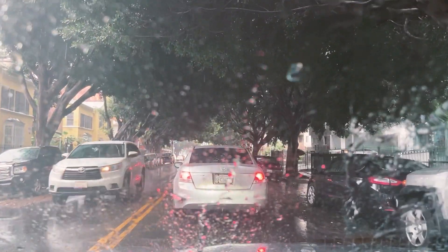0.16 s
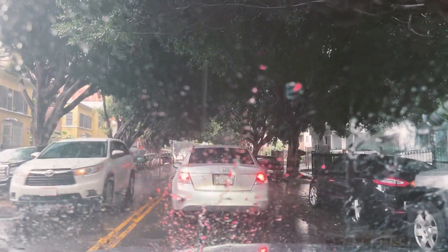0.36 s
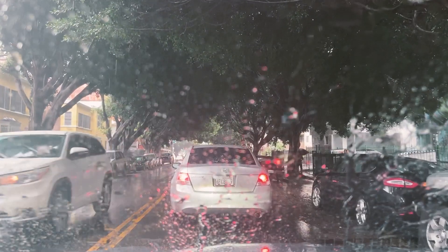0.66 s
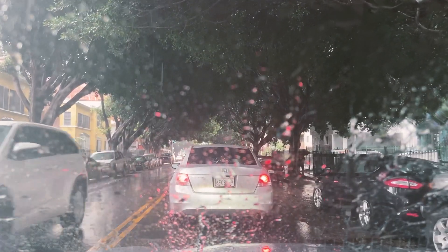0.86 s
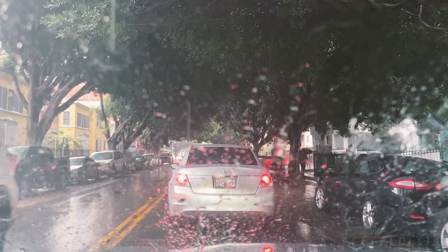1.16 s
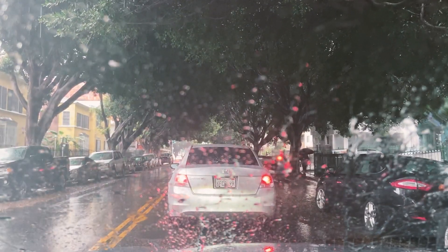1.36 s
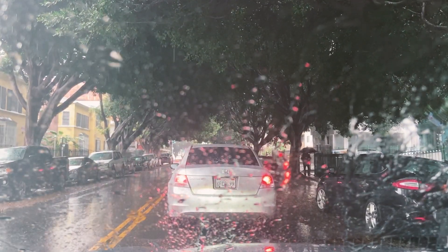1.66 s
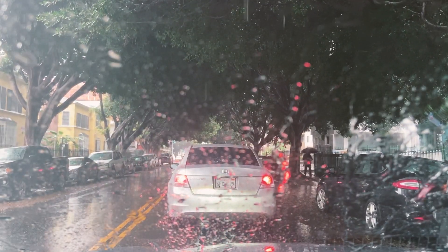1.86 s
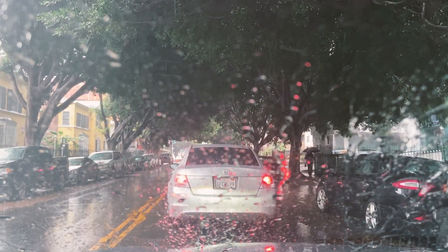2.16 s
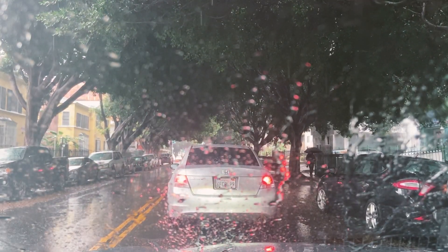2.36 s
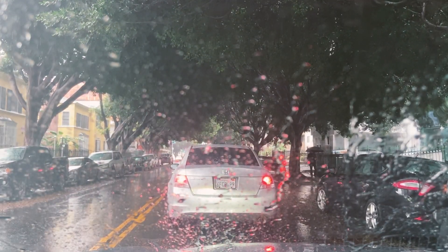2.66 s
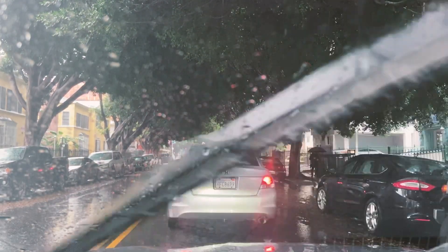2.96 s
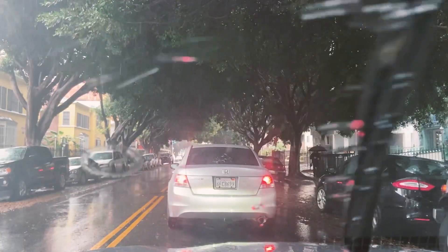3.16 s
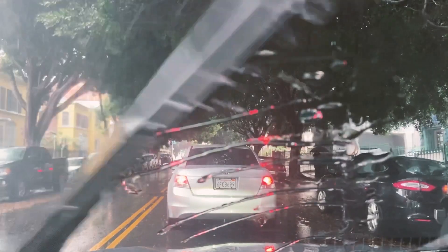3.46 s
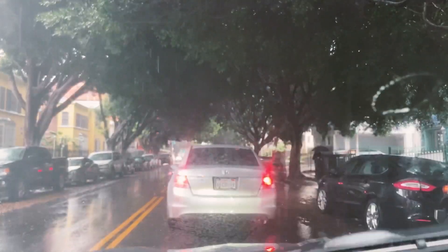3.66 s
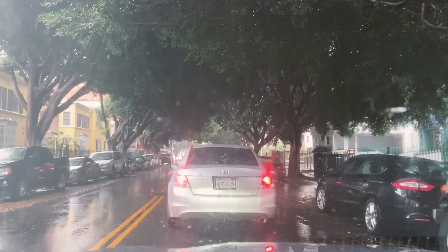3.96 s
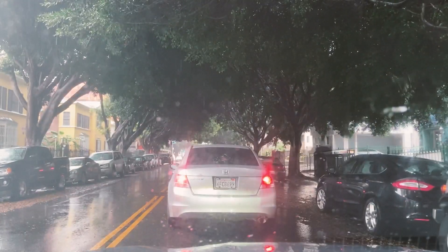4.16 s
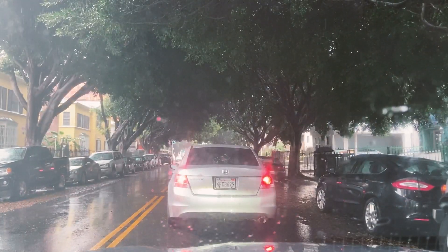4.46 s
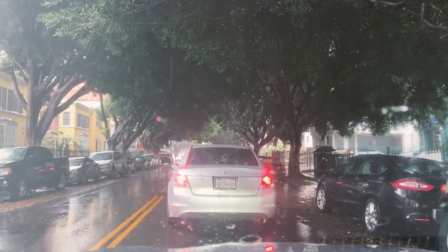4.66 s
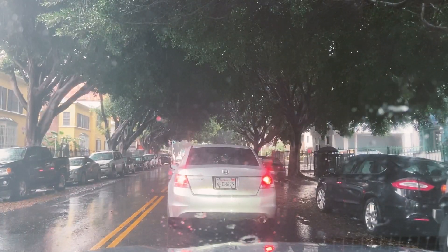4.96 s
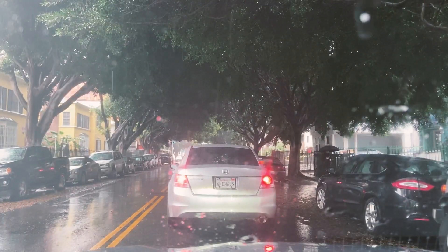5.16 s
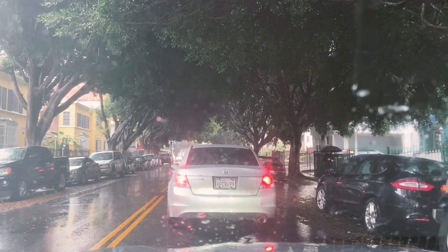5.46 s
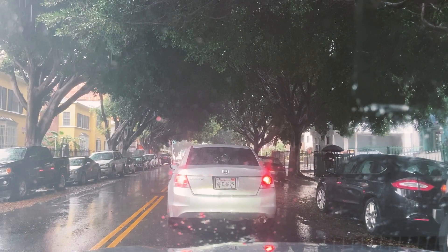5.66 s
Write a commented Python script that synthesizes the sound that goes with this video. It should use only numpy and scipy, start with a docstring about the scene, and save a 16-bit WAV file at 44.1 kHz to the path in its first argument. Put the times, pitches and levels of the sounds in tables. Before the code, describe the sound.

Heavy drops patter and knock on a car roof over a low engine idle, with one booming wiper sweep midway.

```python
"""Inside a car that waits in traffic on a wet street under dripping trees, its engine idling.
From the start fat drops drum on the roof, a noise blow ringing dense panel modes, over a finer patter.
Drops crack on the windscreen as short noise ticks, and some burst into a grainy sizzle of spray.
At 2.6 s the wipers start with sliding low booms, clacks, rubber drag and a motor drone.
They thump again at 3.3 s as they turn round and drag back; the rain and the idle go on to the end."""
import sys
import numpy as np
from scipy import signal
from scipy.fft import rfft, irfft, next_fast_len
from scipy.io import wavfile
from scipy.ndimage import uniform_filter1d

SR = 44100
rng = np.random.default_rng(int(sys.argv[2]) if len(sys.argv) > 2 else 0)


def transcribe(u):
    """Save the signal u as a 16-bit wav file named by the first command-line argument.

    u: samples, shape (n,) or (channels, n), limited to [-1, 1]; the rate is SR.
    q: integer samples, one column per channel.
    """
    v = np.clip(np.atleast_2d(u).T, -1, 1)
    q = np.round(v * 32767).astype(np.int16)
    wavfile.write(sys.argv[1], SR, q)


N = 256662
TIME = np.arange(N) / SR  # seconds


def amp(db):
    """Decibels to gain."""
    return 10 ** (np.asarray(db) / 20)


def unit(x):
    """Scales to rms 1."""
    return x / np.sqrt(np.mean(x ** 2) + 1e-20)


def read(points, hz):
    """Reads a table on a log-frequency axis."""
    f, value = np.transpose(points)
    return np.interp(np.log(hz + 1), np.log(f), value)


def follow(rows):
    """A control curve at every sample."""
    return np.interp(TIME, *np.transpose(rows))


def add(mix, s, sound):
    """Adds a sound into the mix at a time in seconds."""
    part = mix[..., max(round(s * SR), 0):][..., :sound.shape[-1]]
    part += sound[..., :part.shape[-1]]


def wander(hz):
    """Slow random drift of rms 1, with little above the given rate."""
    smooth = np.exp(-(np.fft.rfftfreq(N, 1 / SR) / hz) ** 2)
    return unit(irfft(rfft(rng.standard_normal(N)) * smooth, N))


def bursts(rows):
    """Sum of bell-shaped swells; each row: peak in seconds, level in dB, half length in seconds."""
    return sum(amp(db) * np.exp(-((TIME - s) / half) ** 2) for s, db, half in rows)


# Spread of the sound in the cabin. Each row: frequency in Hz, side over mid in dB.
CABIN_WIDTH = [(40, -17.5), (70, -14), (130, -10), (250, -5.5), (500, 0.7), (1000, 3), (2000, -1.8),
               (4000, -0.8), (8000, -7)]
# Balance of the cabin. Each row: frequency in Hz, left over right in dB.
CABIN_LEAN = [(50, 7.5), (125, 4.5), (250, 0.7), (500, 0.6), (1000, 0), (2000, 1), (4000, 4), (8000, 0)]


def cabin(pair, spectrum, modes=()):
    """Colours a mid and a side signal with a minimum-phase body of rms gain 1, then spreads them."""
    size = next_fast_len(N + SR // 2)
    hz = np.fft.rfftfreq(size, 1 / SR)
    peaks_db = sum(db / (1 + (2 * (hz - f) / w) ** 2) for f, w, db in modes)
    gain = unit(amp(read(spectrum, hz) + peaks_db))
    # the phase follows from the gain, so that nothing sounds ahead of the blow
    both_sides = np.r_[gain, gain[1:(size + 1) // 2][::-1]]
    causal = np.exp(np.conj(signal.hilbert(np.log(both_sides))))[:len(hz)]
    mid, side = rfft(pair, size) * causal
    width, lean = amp(read(CABIN_WIDTH, hz)), amp(read(CABIN_LEAN, hz) / 2)
    left, right = (mid + width * side) * lean, (mid - width * side) / lean
    return irfft(np.array([left, right]), size)[:, :N]


# Ring time over the spectrum. Each row: frequency in Hz, factor on the ring time.
RING_FACTOR = [(120, 1.75), (500, 1.7), (1500, 0.97), (4000, 0.86), (9000, 0.51)]
THUD_HZ, THUD_OCTAVES = 226, 0.86  # where a heavy drop flexes the whole panel, and how widely


def splat(t60, bright_db, thud_db=0, patchy_db=2.0, ripple_db=5.5, rise=0.00032, spray_s=0.01):
    """One blow on a panel: dense modes, coloured by where it lands, the bass ringing longest."""
    spatter = 0.24  # unevenness of the blow's noise
    punch, punch_s = 0.49, 0.0034  # extra strength of the first moment, and its fade in seconds
    echo, echo_s = 0.42, 0.007  # strength and longest delay in seconds of the edge echo
    t = np.arange(SR // 3) / SR
    hz = np.fft.rfftfreq(len(t), 1 / SR)
    centres = np.geomspace(100, 10000, 14)  # Hz
    bands = np.array([np.interp(np.log(hz + 1), np.log(centres), row) for row in np.eye(len(centres))])
    droplets = np.exp(spatter * unit(uniform_filter1d(rng.standard_normal(len(t)), size=90)))
    blow = rfft(unit(droplets * rng.standard_normal((2, len(t)))))
    # each spot wakes some clusters of modes and misses others
    ripple = np.tanh(unit(uniform_filter1d(rng.standard_normal(len(hz)), size=45)))
    clusters = unit(amp(ripple_db * ripple * np.clip(hz / 1000, 0, 2)))
    # the blow comes back from the edge of the panel, sooner or later from spot to spot
    delay = echo_s * rng.random()
    clusters = clusters * (1 + echo * np.exp(-2j * np.pi * hz * delay)) / np.hypot(1, echo)
    modes = irfft((clusters * blow)[:, None] * bands, len(t))
    # brightness tilts the colour about 1 kHz, in dB per tenfold frequency
    colour_db = patchy_db * rng.uniform(-1, 1, len(centres)) + bright_db * np.log10(centres / 1000)
    colour_db = colour_db + thud_db * np.exp(-(np.log2(centres / THUD_HZ) / THUD_OCTAVES) ** 2)
    decay_db = -60 * t / (t60 * read(RING_FACTOR, centres))[:, None]
    # the treble is spray, which lands a moment after the blow
    attack = 1 - np.exp(-t / (rise + spray_s * centres / centres[-1])[:, None])
    # the struck spot rings hardest at first, until the blow has spread over the panel
    attack = attack * (1 + punch * np.exp(-t / punch_s) / (1 + (centres[:, None] / 2000) ** 2))
    return (modes * attack * amp(colour_db[:, None] + decay_db)).sum(1)


# Fat drops on the roof. Each row: start in seconds, level in dB before the trim,
# splash brightness in dB per tenfold frequency, extra thud of the panel in dB.
FAT_DROPS = [(0.01, -26.5, 0, -4), (0.076, -32.5, 12.5, -6.5), (0.103, -28.5, 2, -8.5),
             (0.24, -33.5, -1.5, 3.5), (0.328, -38.5, 0.5, 2), (0.389, -29.5, -1.5, -0.5),
             (0.518, -30, 9.5, -2), (0.565, -26.5, -12, -12), (0.594, -28.5, -3, 7.5),
             (0.727, -27, -11, -8.5), (0.77, -32.5, 3, 0.5), (0.841, -28, 1, -2.5),
             (0.863, -27.5, -0.5, 11.5), (0.931, -27.5, 1, -3), (0.973, -35, 0, 5.5), (1.144, -33.5, 5, 2),
             (1.218, -30.5, 4.5, -6.5), (1.285, -33.5, -11.5, 2), (1.333, -25.5, -8.5, -13.5),
             (1.372, -24.5, -3, -4.5), (1.493, -29, 3, -3), (1.538, -32.5, -5.5, 4), (1.633, -28, 0.5, 4),
             (1.716, -41, -7, 3.5), (1.883, -32.5, 4, -8), (1.988, -28, 0.5, -2.5), (2.118, -27, -7, -1.5),
             (2.175, -34.5, -2.5, 0), (2.239, -26.5, -4.5, -4), (2.43, -32, 2.5, 3.5),
             (2.512, -31.5, 1, -2), (2.698, -35, -4.5, -7), (2.753, -30.5, 0, -0.5), (2.878, -41, 13, 0),
             (2.934, -33, 9, -2), (3.018, -32, 5, -3), (3.081, -31.5, 4, 6), (3.15, -33, -6.5, 5),
             (3.187, -33.5, -9, 9.5), (3.229, -30, -4, 1), (3.373, -30, 3, 4), (3.462, -25, -5.5, -14.5),
             (3.504, -29, -4, -6), (3.565, -42, -5, 11), (3.624, -28.5, -7.5, 1.5), (3.705, -28.5, -9, -5),
             (3.778, -30.5, -4.5, -1), (3.83, -34.5, -9, -2), (3.886, -31.5, -7.5, -5),
             (3.971, -34.5, -1, 1), (4.029, -28, -3, -2.5), (4.087, -24.5, -7, -9),
             (4.141, -28.5, -8, -6.5), (4.188, -31.5, 3, 0.5), (4.461, -30, -2.5, -1.5),
             (4.511, -35.5, 8.5, -10), (4.551, -49, 7, 0), (4.585, -31.5, -3, -4.5), (4.677, -25.5, -4, 2),
             (4.728, -30, -2, 5.5), (4.773, -42.5, -12, 8), (4.818, -31.5, -1, 0), (4.869, -31, 4, 2),
             (4.907, -25.5, -1.5, 7.5), (4.976, -29.5, 0, 3.5), (5.158, -29.5, -4.5, -2.5),
             (5.202, -38, -13.5, 1.5), (5.283, -28.5, 6, 4.5), (5.505, -34.5, 7, 2), (5.62, -31.5, 1, 2),
             (5.655, -43.5, -9, 11), (5.75, -32.5, 2.5, 4)]
# Colour of the roof heard from the seats. Each row: frequency in Hz, relative level in dB per Hz.
ROOF_COLOUR = [(60, -29.5), (110, 1), (165, 1.5), (240, -8.5), (450, -8.5), (700, -12), (1100, -12),
               (1700, -17.5), (2900, -24), (4700, -26), (6300, -32), (8400, -31), (10000, -41.5)]
# Strongest roof panel modes. Each row: frequency in Hz, width in Hz, height in dB above the rest.
ROOF_MODES = [(186, 16, 4), (285, 18, 3.5), (365, 70, 4.5), (480, 60, 3.5), (695, 80, 7.5), (985, 90, 3),
              (1160, 120, 3), (1533, 70, 4), (1830, 140, 2.5), (2457, 100, 4.5)]


def fat_drops(trim_db=-5):
    """Water gathered by the leaves falls on the roof in single heavy blows."""
    out = np.zeros((2, N))
    for s, db, bright_db, thud_db in FAT_DROPS:
        # ring time in seconds, before its factor over the spectrum
        add(out, s, amp(db + trim_db) * splat(0.22, bright_db, thud_db))
    return cabin(out, ROOF_COLOUR, ROOF_MODES)


# Fine rain between the flurries. Each row: time in seconds, level in dB before the patter's trim.
DRIZZLE_LEVEL = [(0, -38), (0.22, -44.5), (0.7, -47), (1.5, -39.5), (2.55, -48), (2.85, -43), (3.2, -36),
                 (3.4, -43), (3.9, -46.5), (4.25, -45), (4.43, -44.5), (4.6, -42), (5.08, -46),
                 (5.25, -40.5), (5.45, -45.5), (5.65, -38), (5.82, -40.5)]
# Flurries of small drops shaken from the branches.
# Each row: peak in seconds, level in dB before the patter's trim, fade in seconds.
BRANCH_FLURRIES = [(0.0, -26.5, 0.012), (0.109, -33, 0.039), (0.327, -36.5, 0.022), (0.44, -36.5, 0.056),
                   (0.529, -35, 0.062), (0.75, -36.5, 0.036), (0.839, -33.5, 0.047), (1.05, -33.5, 0.03),
                   (1.247, -35.5, 0.15), (1.471, -47.5, 0.18), (1.66, -40, 0.41), (2.01, -36, 0.062),
                   (2.253, -38, 0.24), (2.72, -29.5, 0.019), (3.246, -35, 0.0098), (3.56, -38, 0.23),
                   (3.80, -39.5, 0.16), (4.611, -32.5, 0.03), (5.29, -54, 0.09), (5.80, -39, 0.066)]


def rainfall(rise_s=0.047):
    """Strength of the fine rain: a drizzle plus flurries that rise and then thin out exponentially."""
    power = amp(follow(DRIZZLE_LEVEL)) ** 2
    for s, db, fade in BRANCH_FLURRIES:
        swell = np.exp(-np.maximum((s - TIME) / rise_s, (TIME - s) / fade))
        power = power + (amp(db) * swell) ** 2
    return np.sqrt(power)


def patter(per_s=560, spread_db=13, t60=0.074, trim_db=-7.5, spots=28):
    """Small drops of uneven size land at random on several spots of the roof."""
    size = amp(spread_db * rng.random(N)) * (rng.random(N) < per_s / SR)
    spot = rng.integers(0, spots, N)
    out = np.zeros((2, N))
    for k in range(spots):
        drop = splat(t60, bright_db=1, rise=0.0016, spray_s=0.0059)
        out += signal.oaconvolve((size * (spot == k))[None], drop, axes=1)[:, :N]
    return cabin(unit(out) * amp(trim_db) * rainfall(), ROOF_COLOUR, ROOF_MODES)


# Sharp drops on the windscreen. Each row: start in seconds, level in dB before the trim.
GLASS_TICKS = [(0.2389, -34.5), (0.3886, -41), (0.7716, -37.5), (0.9324, -46), (1.3724, -36.5),
               (1.698, -39), (1.715, -39), (1.9659, -43), (2.0817, -39), (2.1762, -37), (2.4518, -46),
               (2.4962, -40.5), (2.5115, -38), (2.699, -42.5), (2.8777, -40), (3.2908, -38.5),
               (3.3135, -36.5), (3.6238, -44), (3.708, -36), (4.084, -38), (4.0955, -45), (4.118, -39),
               (4.141, -38), (4.256, -47), (4.321, -42.5), (4.5535, -40.5), (4.678, -42), (4.8187, -48.5),
               (5.7773, -37)]
# Colour of a windscreen tick. Each row: frequency in Hz, relative level in dB per Hz.
GLASS_COLOUR = [(150, -12), (700, 8), (2000, -1), (4000, -3), (7500, -9), (10000, -16.5)]


def windscreen(crack_s=0.00042, ring_s=0.008, ring_db=-11, trim_db=4.0):
    """Drops crack on the stiff glass, which hardly rings; many tiny ones fall at random times."""
    per_s, small_db, spread_db = 24, -57, 5  # tiny drops: rate, lowest level before the trim, spread
    t = np.arange(SR // 20) / SR
    times = TIME[rng.random(N) < per_s / SR]
    small = [(s, small_db + spread_db * min(rng.exponential(), 2)) for s in times]
    out = np.zeros((2, N))
    for s, db in list(GLASS_TICKS) + small:
        blow, shimmer = rng.standard_normal((2, 2, len(t)))
        crack = np.sign(blow) * np.exp(-t / crack_s)
        ring = amp(ring_db) * shimmer * np.exp(-t / ring_s)
        add(out, s, amp(db + trim_db) * (crack + ring))
    return cabin(out, GLASS_COLOUR)


# Drops that burst into fine spray on the glass.
# Each row: peak in seconds, level in dB, half length in seconds.
SPRAY_BURSTS = [(0.454, -52, 0.02), (0.512, -54, 0.012), (0.586, -51, 0.026), (0.71, -53, 0.015),
                (1.474, -48, 0.019), (2.145, -50.5, 0.021), (2.236, -48, 0.012), (2.534, -50.5, 0.013),
                (3.152, -50, 0.017), (3.235, -49, 0.013), (3.489, -51, 0.024), (4.60, -57, 0.017),
                (4.928, -52, 0.024), (4.977, -53.5, 0.015), (5.077, -49, 0.011), (5.225, -48.5, 0.0083),
                (5.302, -57, 0.017), (5.379, -48.5, 0.019), (5.528, -52.5, 0.022), (5.81, -51, .025)]
# Colour of the spray. Each row: frequency in Hz, relative level in dB per Hz.
SPRAY_COLOUR = [(500, -12), (1500, 3.5), (3000, 1), (4700, -0.5), (6300, -5.5), (8400, -12.5), (10000, -13)]


def spray(per_s=2200, spread_db=18, tail_s=0.0023, spots=4):
    """A burst drop showers the glass with tiny droplets: a short, grainy sizzle."""
    t, out = np.arange(SR // 50) / SR, np.zeros((2, N))
    for _ in range(spots):
        droplets = amp(spread_db * rng.random(N)) * (rng.random(N) < per_s / spots / SR)
        grain = rng.standard_normal((2, len(t))) * np.exp(-t / tail_s)
        out += signal.oaconvolve(droplets[None], grain, axes=1)[:, :N]
    return cabin(unit(out) * bursts(SPRAY_BURSTS), SPRAY_COLOUR)


# Knocks of the wiper drive through the body. Each row: start in seconds, level in dB,
# starting pitch in Hz, rise in seconds, time to fall 60 dB in seconds.
WIPER_THUMPS = [(2.607, -24, 105, 0.0078, 0.13), (2.626, -22.5, 101.8, 0.011, 0.45),
                (2.686, -31, 71, 0.009, 0.25), (3.257, -22.5, 128, 0.018, 0.22),
                (3.287, -20, 112.2, 0.0313, 0.48), (3.3, -27, 170, 0.012, 0.18),
                (3.349, -22.5, 71.4, 0.015, 0.31)]


def wiper_thumps(left_db=1.3, uneven=0.77, upper=2.3, upper_db=-12):
    """The linkage takes up its load, booming in the cabin, each boom sliding down as it unloads."""
    sag, sag_s = 0.12, 0.074  # share of the pitch lost, and how quickly in seconds
    t, knocks = np.arange(SR) / SR, np.zeros(N)
    for s, db, hz, rise, t60 in WIPER_THUMPS:
        swell = np.minimum(t / rise, 1) * amp(-60 * np.maximum(t - rise, 0) / t60)
        pitch = hz * (1 - sag * (1 - np.exp(-t / sag_s)))
        angle = 2 * np.pi * np.cumsum(pitch) / SR + uneven * wander(41)[:SR]
        # a higher mode of the bulkhead dies twice as fast
        overtone = amp(upper_db) * swell ** 2 * np.sin(upper * angle)
        add(knocks, s, amp(db) * (swell * np.sin(angle) + overtone))
    # the body passes little below 35 Hz
    knocks = signal.sosfilt(signal.butter(2, 35, "highpass", fs=SR, output="sos"), knocks)
    return knocks * amp([[left_db], [-left_db]])


# Blades dragging over the glass, out and back.
# Each row: start in seconds, length in seconds, level in dB.
BLADE_STROKES = [(2.61, 0.72, -43), (3.51, 0.18, -44.5)]
# Blades flipping over as they start and as they turn round.
# Each row: peak in seconds, level in dB, half length in seconds.
BLADE_FLIPS = [(2.639, -35, 0.039), (3.31, -36, 0.045)]
# Colour of the rubber on the glass. Each row: frequency in Hz, relative level in dB per Hz.
BLADE_COLOUR = [(25, -34), (55, -1), (110, 3.5), (165, -2.5), (215, -20.5), (300, -18), (500, -22.5),
                (1500, -46), (6000, -63)]


def wiper_blades(edge_s=0.052):
    """Rubber drags over the glass as low noise, swelling where the blades flip over."""
    sliding = np.zeros(N)
    for s, length, db in BLADE_STROKES:
        # the blades take a moment to get going and to stop
        sliding += amp(db) * np.clip(np.minimum(TIME - s, s + length - TIME) / edge_s, 0, 1)
    return cabin(rng.standard_normal((2, N)) * (sliding + bursts(BLADE_FLIPS)), BLADE_COLOUR)


# Play in the wiper joints closes with a clack.
# Each row: start in seconds, level in dB, brightness in dB per tenfold frequency.
JOINT_CLACKS = [(2.633, -28.5, 1), (2.698, -37, 7), (3.266, -34, -9), (3.292, -30, -4), (3.311, -41, 8),
                (3.322, -29, -6)]
# Colour of the linkage. Each row: frequency in Hz, relative level in dB per Hz.
LINKAGE_COLOUR = [(100, -1), (220, 8), (380, 10), (600, -2.5), (1100, -21), (1800, -31.5), (4000, -14.5),
                  (10000, -46)]


def wiper_joints(t60=0.02):
    """Short, hard knocks on top of the boom as the arms start and turn round."""
    out = np.zeros((2, N))
    for s, db, bright_db in JOINT_CLACKS:
        add(out, s, amp(db) * splat(t60, bright_db, patchy_db=1.5, ripple_db=5.0, spray_s=0.0005))
    return cabin(out, LINKAGE_COLOUR)


# Drone of the wiper motor under load. Each row: time in seconds, level in dB.
MOTOR_LEVEL = [(2.6, -65.5), (2.72, -42), (2.84, -35), (2.95, -39), (3.05, -56.5), (3.45, -43.5),
               (3.55, -37.5), (3.65, -52), (3.85, -60.5)]


def wiper_motor(hz=94, sag_hz=14, waver=0.87, drift=1.2):
    """The geared motor drones roughly through the bulkhead, slowing as its load grows."""
    level = amp(follow(MOTOR_LEVEL))
    # the pitch sits half the sag above hz when unloaded and half below at full load
    angle = 2 * np.pi * np.cumsum(hz + sag_hz * (.5 - level / level.max())) / SR
    drone = unit((1 + waver * wander(25)) * np.sin(angle + drift * wander(18)))
    return drone * level


# Orders of the crankshaft. Each row: multiple of its turning rate, level in dB.
CRANK_ORDERS = [(2, -46), (3, -47.5), (4, -48.5), (5, -47), (6, -53.5), (8, -57.5)]
# Colour of the body rumble. Each row: frequency in Hz, relative level in dB per Hz.
RUMBLE_COLOUR = [(15, -45), (30, -9), (42, -1), (60, 2), (110, 0.5), (160, -1), (250, -7.5), (600, -15),
                 (2000, -57.5)]
# Rise and fall of the body rumble. Each row: time in seconds, level in dB.
RUMBLE_LEVEL = [(0, -40), (.12, -42.5), (.5, -39.5), (1.4, -43.5), (1.9, -44), (2.15, -43), (2.45, -42.5),
                (4.3, -43.5), (4.9, -46.5), (5.15, -45.5), (5.82, -43.5)]


def engine(waver=0.31, drift=0.2, left_db=0.5):
    """Low orders of the idling crankshaft hum through the body over a soft rumble."""
    idle_hz, stray_hz = 23.17, 0.1423  # crankshaft turns a second, and how far they stray
    angle = 2 * np.pi * np.cumsum(idle_hz + stray_hz * wander(0.85)) / SR
    hum = np.zeros(N)
    for order, db in CRANK_ORDERS:
        phase = round(order) * angle + drift * wander(0.73) + 2 * np.pi * rng.random()
        hum += np.sqrt(2) * amp(db) * (1 + waver * wander(7.2)) * np.sin(phase)
    rumble = cabin(rng.standard_normal((2, N)), RUMBLE_COLOUR) * amp(follow(RUMBLE_LEVEL))
    return hum * amp([[left_db], [-left_db]]) + rumble


def scene():
    """Rain, wipers and engine as heard from the front seats."""
    rain = fat_drops() + patter() + windscreen() + spray()
    wipers = wiper_thumps() + wiper_blades() + wiper_joints() + wiper_motor()
    return rain + wipers + engine()


def record(dry):
    """Band limit: a steep linear-phase filter takes away the treble above 9850 Hz."""
    lowpass = signal.firwin(511, 9850, window=("kaiser", 9), fs=SR)
    return signal.oaconvolve(dry, lowpass[None], "same")


dry = scene()
out = record(dry)
transcribe(out)
```